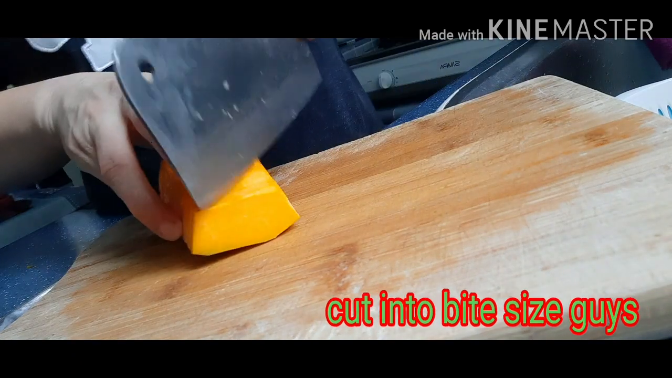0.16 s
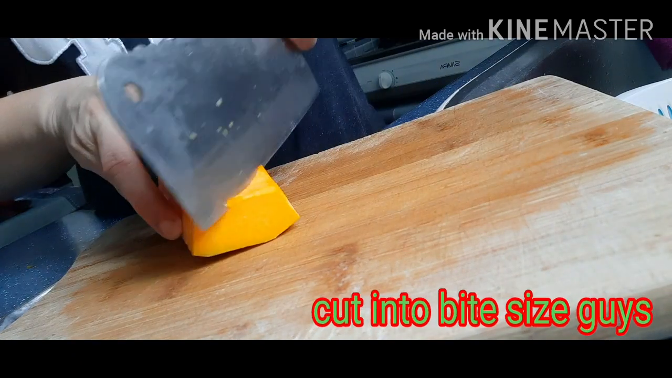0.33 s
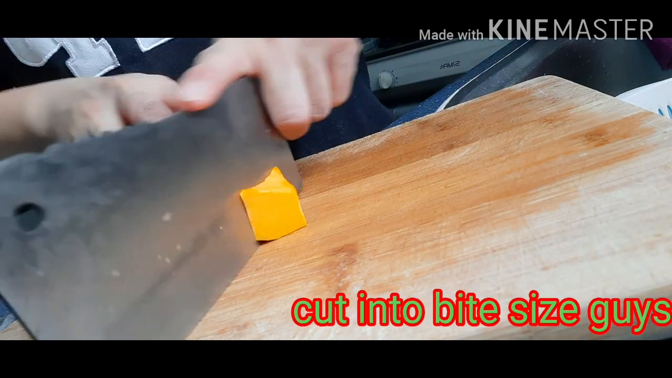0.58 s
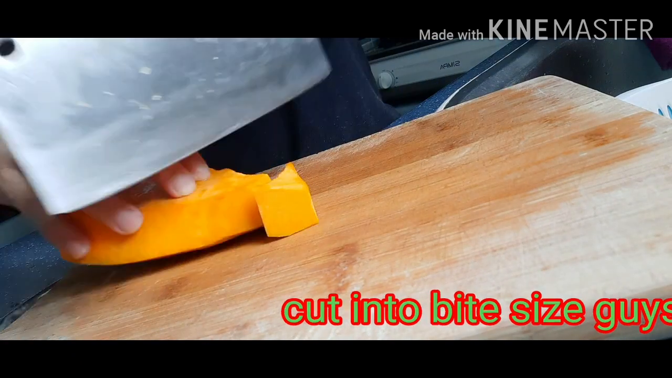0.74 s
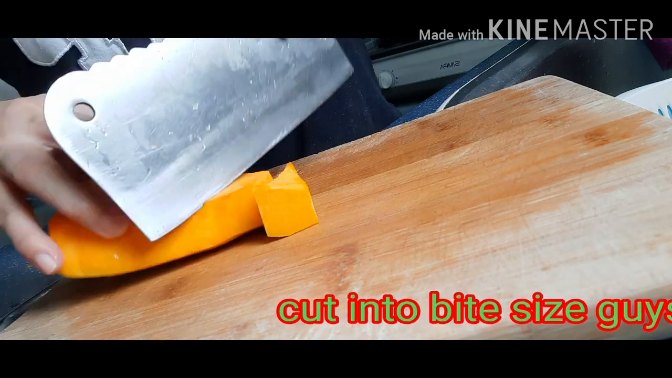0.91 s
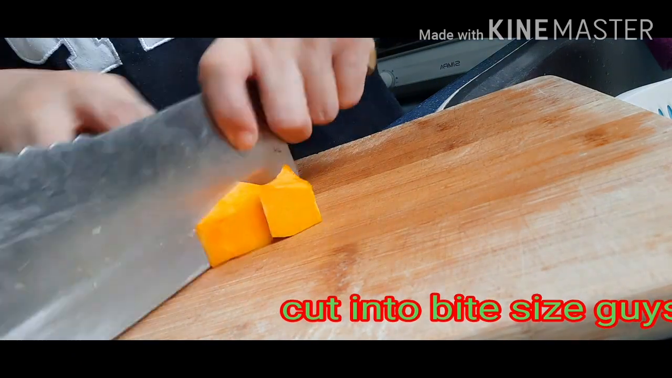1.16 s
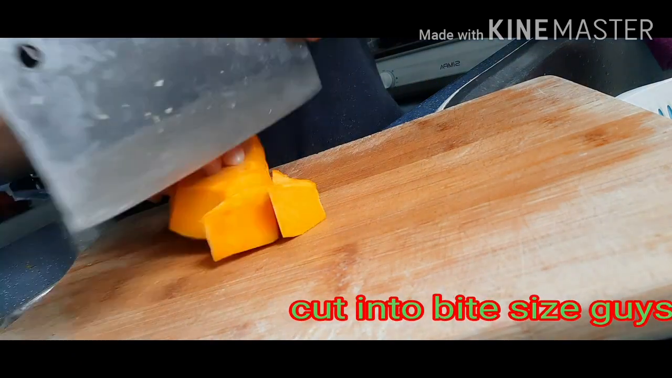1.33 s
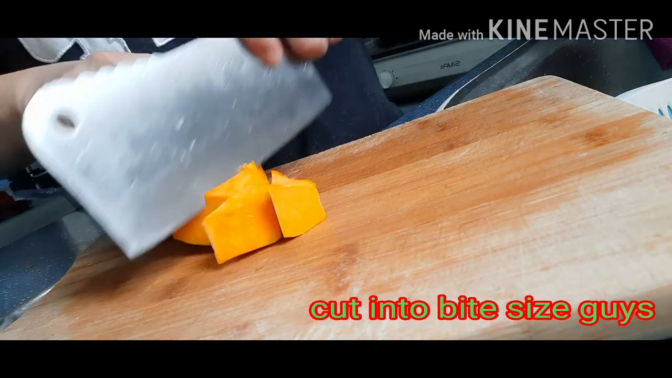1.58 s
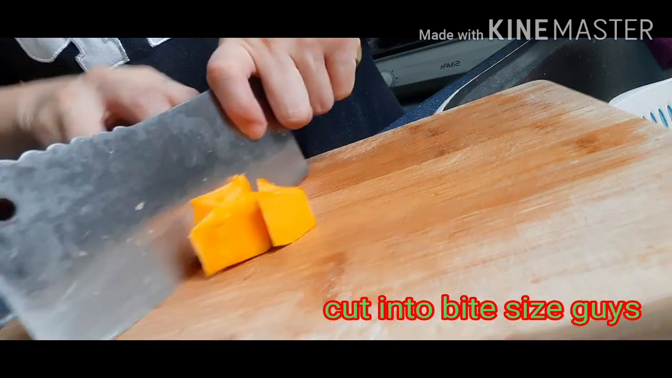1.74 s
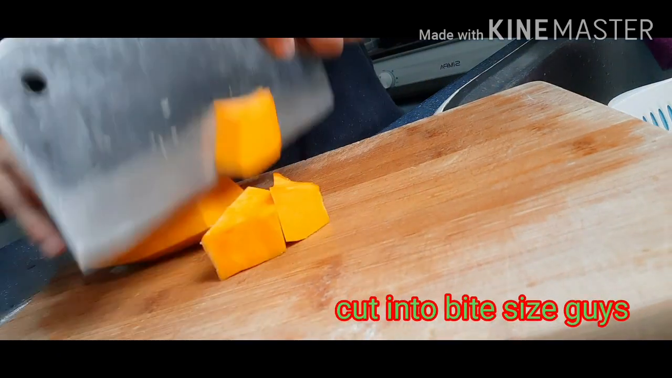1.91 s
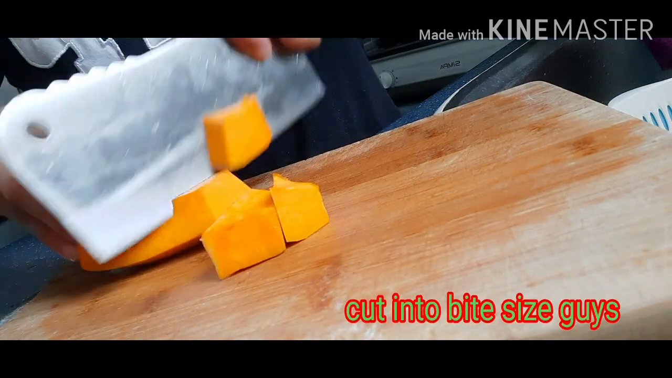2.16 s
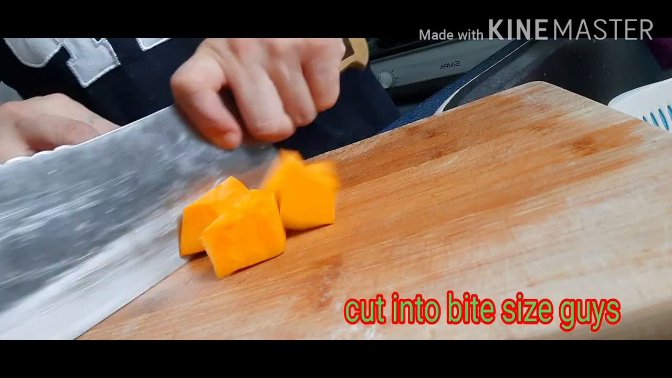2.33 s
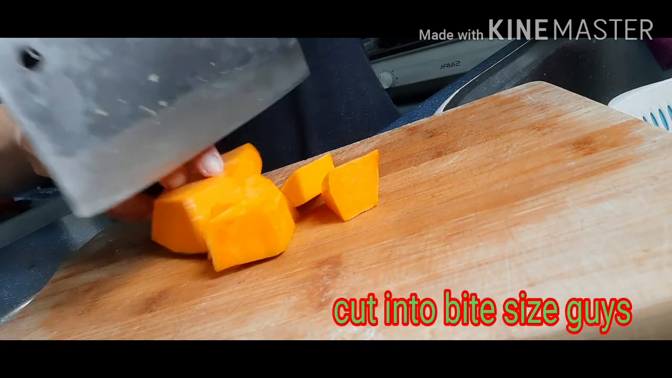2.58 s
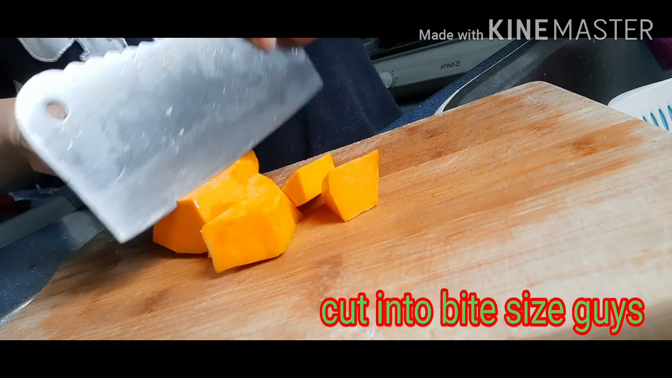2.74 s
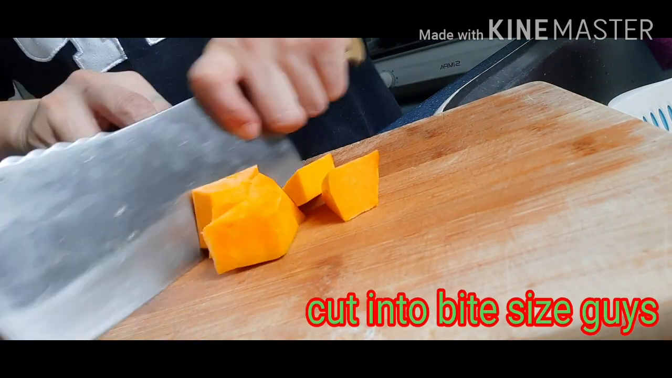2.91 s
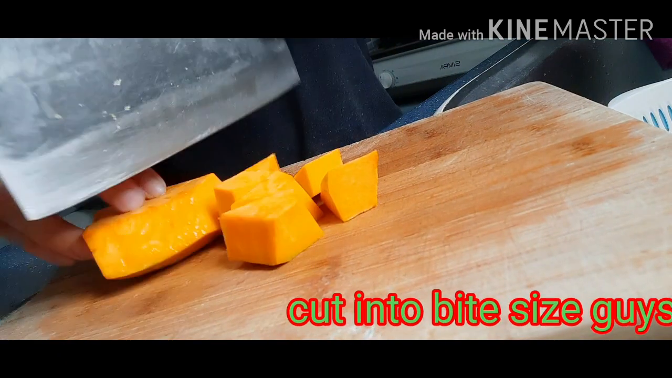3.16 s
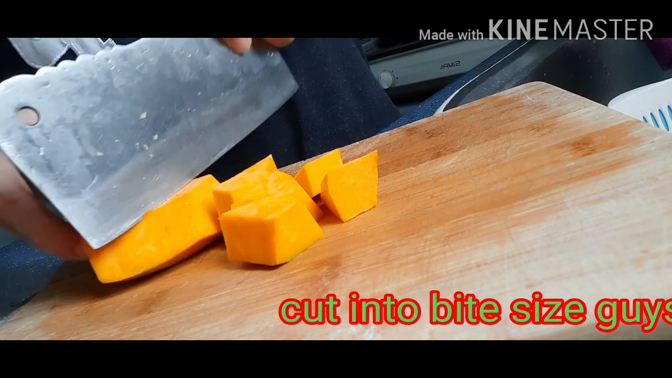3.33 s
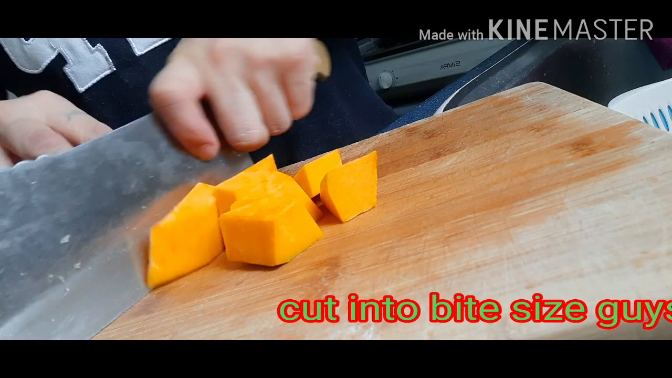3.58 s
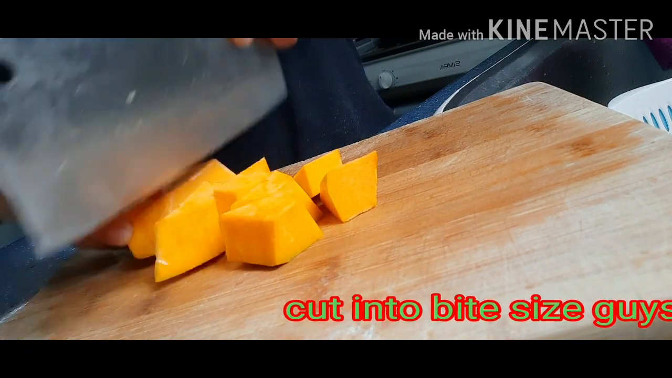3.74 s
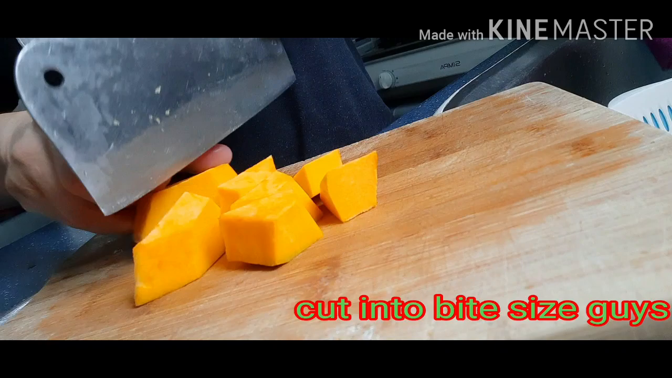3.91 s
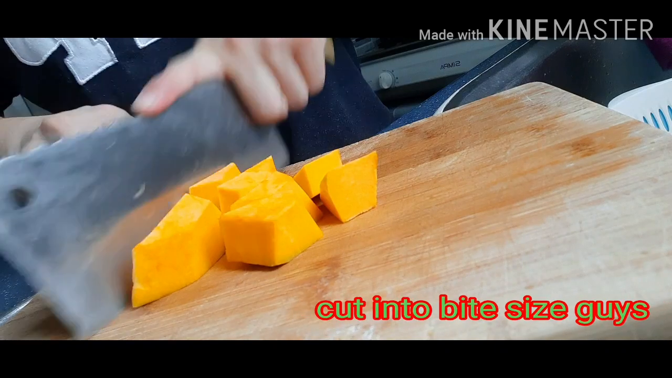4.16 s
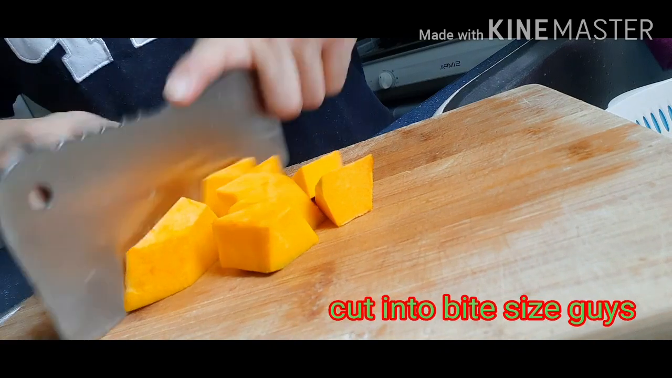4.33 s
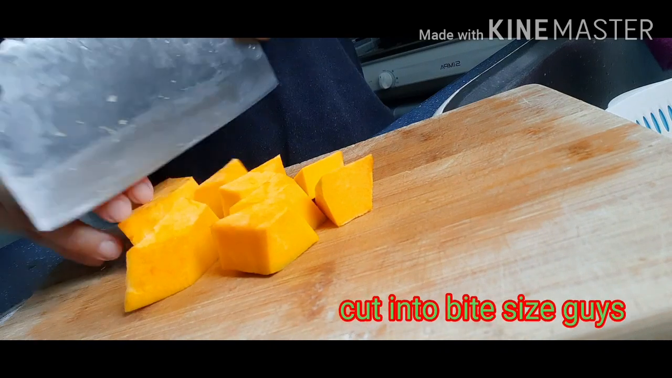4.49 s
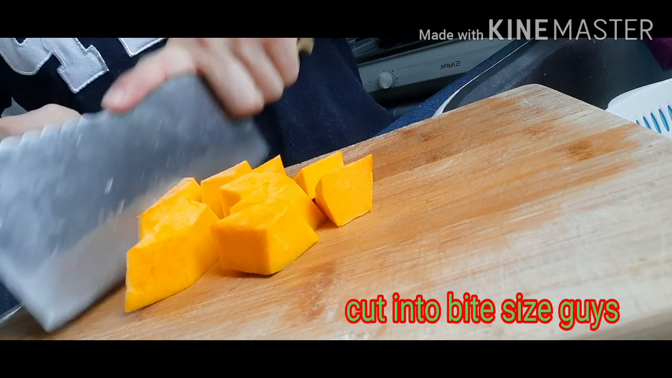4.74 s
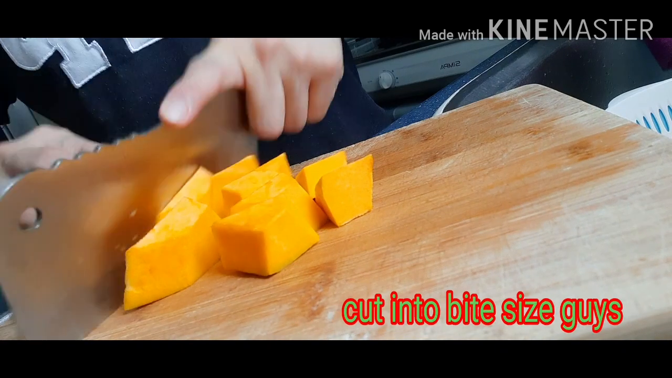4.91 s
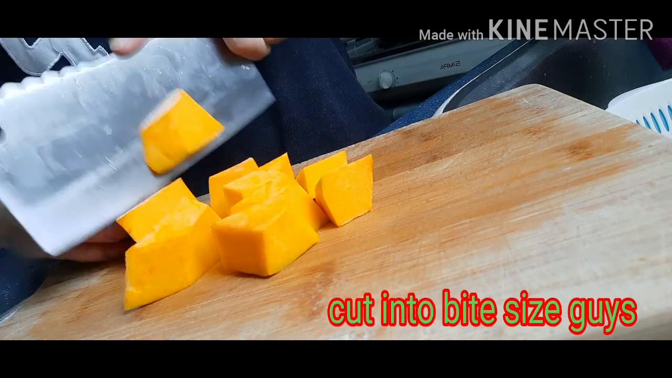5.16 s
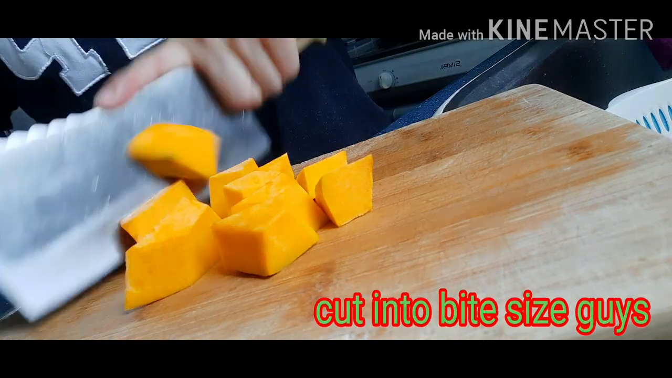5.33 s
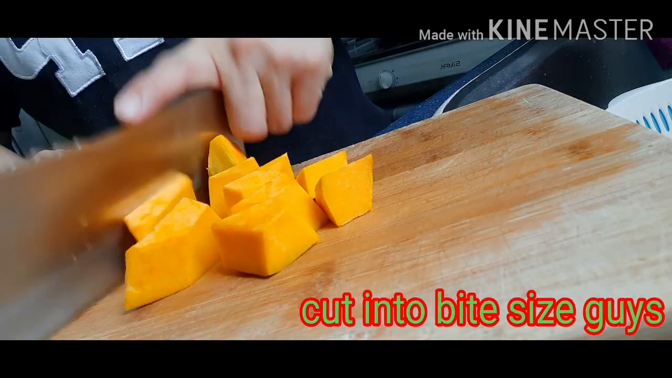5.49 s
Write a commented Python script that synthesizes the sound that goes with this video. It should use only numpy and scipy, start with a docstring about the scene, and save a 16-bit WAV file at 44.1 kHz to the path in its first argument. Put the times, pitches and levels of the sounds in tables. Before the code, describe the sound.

A steel cleaver cuts pumpkin into cubes on a wooden board, nine chops at a steady, unhurried pace. Each starts with a small bite into the rind, swells into a crisp hiss and ends in a snap, a wooden knock and a dull thump. Between chops the wet blade drags briefly and loose cubes tumble softly. The sound is close, in a small kitchen with a short echo and a faint low rumble.

```python
"""Nine crisp chops in a row, each ending in a wooden knock: a steel cleaver cubes pumpkin on a board.
Each time the edge bites the rind, hisses through the flesh ever faster, and the last of it snaps.
The blade's tip knocks on the board, its heel (the back end) rocks down after it, and the board thumps
on the counter. The wet blade drags as it lifts, and loose cubes tumble.
The small kitchen adds a short echo and a low, steady rumble."""
import sys
import numpy as np
from scipy import signal
from scipy.fft import rfft, irfft
from scipy.io import wavfile

SR = 44100
rng = np.random.default_rng(int(sys.argv[2]) if len(sys.argv) > 2 else 0)


def int16_out(signal):
    """Quantize to a 16-bit WAV file."""
    q = np.round(np.clip(np.atleast_2d(signal).T, -1, 1) * 32767)
    wavfile.write(sys.argv[1], SR, q.astype(np.int16))


N = 250488
TIME = np.arange(N) / SR

# Table levels are relative. A blow's "hardness" is the pitch above which its knock is muffled.
# The edge bites the rind: t/s, crack level/dB, crack centre/Hz, knock level/dB
RIND_BITES = [(.198, -52, 9000, -60), (.889, -42, 9000, -58), (1.472, -50, 9000, -67),
              (2.086, -21, 2400, -37), (2.692, -50, 4000, -49), (3.3074, -50, 8900, -73),
              (3.982, -51, 9000, -55.5), (4.6, -25.5, 2920, -35.5), (5.182, -19.5, 3350, -32.5)]
# The flesh gives way: snap t/s, pressing hiss/dB, final rush/dB, snap level/dB, tearing before it/s
FLESH_CUTS = [(0.4938, -48, -37.5, -21.5, .002), (1.072, -45, -37.5, -28.5, .002),
              (1.684, -43.5, -39.5, -16.5, .002), (2.276, -46, -39, -33, .011),
              (2.882, -46, -42, -22, 0.012), (3.469, -48, -34.5, -19, 0.02), (4.166, -45, -52, -18, .036),
              (4.791, -45.5, -45, -16, .006), (5.3564, -43.5, -35, -18.5, .006)]
# The blade lands: tip t/s, knock/dB, thump/dB, hardness/Hz, click/dB, heel delay/s, heel knock/dB
BLADE_LANDINGS = [(.4827, -21.5, -14.5, 1200, -40, 0.018, -20.5),
                  (1.0623, -20, -17.5, 1490, -21, 0.037, -27), (1.666, -16.5, -18, 1160, -45, 0.033, -22.5),
                  (2.277, -13.5, -13.5, 1380, -22.5, 0.014, -27.5),
                  (2.8847, -17, -15, 2840, -11.5, 0.012, -20.5),
                  (3.4853, -19.5, -19, 2290, -10.5, 0.016, -25.5),
                  (4.1692, -17, -17, 1800, -15.5, .0185, -25.5),
                  (4.7935, -16, -23.5, 1670, -43, 0.0092, -31), (5.3535, -22.5, -22, 1600, -55, 0.03, -26)]


def from_db(db):
    """Turn decibels into a factor to multiply by."""
    return 10 ** (np.asarray(db) / 20)


def unit_power(x):
    """Scale a sound to an average power of one."""
    return x / np.sqrt(np.mean(x ** 2) + 1e-20)


def at_hz(points, hz):
    """Read between a table's rows, with the octaves evenly spaced."""
    freqs, values = np.transpose(points)
    return np.interp(np.log(np.maximum(hz, 1)), np.log(freqs), values)


def butter(x, hz, kind, order=2):
    """Keep the lows, the highs or a band; a higher order cuts more steeply."""
    return signal.sosfilt(signal.butter(order, np.clip(hz, 10, .48 * SR), kind, fs=SR, output="sos"), x)


def colour(x, spectrum):
    """Give a noise the tone colour in a table, at a power of one."""
    hz = np.arange(N // 2 + 1) * SR / N
    return unit_power(irfft(rfft(x) * from_db(at_hz(spectrum, hz)), N))


def dying(t, fade_s):
    """A smooth fade that is 60 dB down after fade_s."""
    return np.exp(-np.log(1000) * t / fade_s)


def add(track, s, sound):
    """Mix a sound in, starting at s seconds."""
    start = int(np.clip(s * SR, 0, N - 1))
    track[start:start + len(sound)] += sound[:N - start]


def rumble():
    """The kitchen's low, steady background, alike on both sides in the bass."""
    # Tone colour of the rumble: f/Hz, level/dB
    spectrum = [(30, -37), (60, 1), (100, 3.5), (170, 7), (300, -9), (430, -2), (600, -15), (1100, -17),
                (1700, -29), (2500, -24.5), (4500, -39.5), (9000, -42.5), (15000, -46.5)]
    mid, side = colour(rng.standard_normal((2, N)), spectrum)
    return from_db(-52.5) * (mid + butter(side, 550, "high", order=1) * [[1], [-1]])


def kitchen_echo(x):
    """Walls and cupboards send back many echoes, different at each ear; the highest notes die first."""
    # Strength of the echo: f/Hz, level/dB
    echo_levels = [(60, -29.5), (150, -10), (400, -6.5), (1000, -8.5), (2200, -6.5), (5000, -10),
                   (14000, -7)]
    # How long the echo lasts: f/Hz, fade time/s
    echo_fades = [(100, .27), (500, 0.18), (2000, 0.16), (6000, 0.19), (14000, 0.1)]
    t, octave_edges = TIME[:SR // 2], 60 * 2 ** np.arange(9.)
    white, response = rng.standard_normal((2, 2, len(t))), 0
    onset = np.clip((t - .004) / .004, 0, 1)   # the nearest walls answer after 4 ms
    for k, (low, high) in enumerate(zip(octave_edges, octave_edges[1:])):
        hz = np.sqrt(low * high)
        tail = butter(white[k % 2], [low, high], "band") * onset * dying(t, at_hz(echo_fades, hz))
        band_share = np.sqrt(2 * (high - low) / SR / len(t))
        mid, side = unit_power(tail) * band_share * from_db(at_hz(echo_levels, hz))
        alike = 1 / (1 + (hz / 450) ** 2)   # long waves reach both sides alike
        response = response + np.sqrt(1 + alike) * mid + np.sqrt(1 - alike) * side * [[1], [-1]]
    return signal.fftconvolve(x[None], response, axes=1)[:, :N]


def blade_reflections(x, sways_per_s=4, sway_share=.3433):
    """Treble bounces off the blade and board, along paths that grow and shrink as the blade moves."""
    # The bounces: left delay/s, right delay/s, level/dB
    bounces = [(.0013, .0017, -3.5), (.0027, .0022, -2.5), (.0036, .0044, -4.5)]
    treble, out = butter(x, 2200, "high"), np.zeros((2, N))
    turns = np.arange(32) / sways_per_s
    for left_s, right_s, db in bounces:
        stretch = 1 + sway_share * np.interp(TIME, turns, rng.uniform(-.998, 1, len(turns)))
        delayed = [np.interp(TIME - lag * stretch, TIME, treble) for lag in (left_s, right_s)]
        out += from_db(db) * np.array(delayed)
    return out


def bursting_cells(pops_per_s=700, grain_db=3, pop_db=-3.5):
    """Countless pumpkin cells burst in a fizz, and tearing fibres add scattered pops."""
    # Tone colour of the slicing hiss: f/Hz, level/dB
    spectrum = [(300, 22.5), (1100, 9), (1700, 3), (2200, 8), (3200, 3), (4800, -4.5), (7000, 1.5),
                (11500, -2.5), (13500, -2.5), (15500, -15)]
    sizes = from_db(grain_db * np.minimum(rng.exponential(1, N), 4)) * rng.choice([-1, 1], N)
    pops = unit_power(sizes * (rng.random(N) < pops_per_s / SR))
    return colour(rng.standard_normal(N) + from_db(pop_db) * pops, spectrum)


def slicing(sink_s=.0083, rush_s=.021, release_s=.039):
    """The flesh rasps louder as the hand bears down, then gives way with a bright rush."""
    pressure, speed = np.zeros((2, N))
    for (bite_s, *_), (snap_s, press_db, rush_db, _, _) in zip(RIND_BITES, FLESH_CUTS):
        start = bite_s + sink_s   # the edge reaches the flesh
        release = np.exp(-np.maximum(TIME - snap_s, 0) / release_s)
        pressure += from_db(press_db) * np.clip((TIME - start) / (snap_s - start), 0, 1) * release
        speed += from_db(rush_db) * np.exp(np.minimum(TIME - snap_s, 0) / rush_s) * release
    crunch = bursting_cells()
    return pressure * butter(crunch, 250, "high") + speed * butter(crunch, 2500, "high")


def crack_events(bite_fade_s=.0072, click_fade_s=.0037, click_hz=5300, snap_fade_s=.0074, snap_hz=10400):
    """List each rind bite, click into the wood, drag, tear and snap: t/s, level/dB, fade/s, f/Hz."""
    # The wet blade drags past the cut faces as it lifts: t/s, level/dB, fade time/s, centre/Hz
    wet_drags = [(1.301, -53.5, 0.098, 6000), (1.799, -38, 0.13, 3750), (2.3772, -43, 0.039, 3550),
                 (2.478, -50.5, 0.16, 7000), (3.008, -37.5, 0.044, 4670), (3.025, -32.5, .013, 6030),
                 (3.6124, -36, 0.014, 7850), (3.779, -53, 0.05, 7800), (4.3008, -24.5, 0.011, 4070),
                 (5.435, -34, 0.047, 4770)]
    rows = [(s, db, bite_fade_s, hz) for s, db, hz, _ in RIND_BITES]
    rows += [(s + .0015, db, click_fade_s, click_hz) for s, _, _, _, db, _, _ in BLADE_LANDINGS]
    rows += list(wet_drags)
    for snap_s, _, _, snap_db, tear_s in FLESH_CUTS:
        # Uneven little tears lead up to the snap, growing by 332 dB a second.
        leads_s = np.cumsum(.0042 * rng.uniform(.5, 1.5, size=12))
        levels = snap_db - 332 * leads_s - 3.5 * rng.standard_normal(len(leads_s))
        rows += [(snap_s, snap_db, snap_fade_s, snap_hz)]
        rows += [(snap_s - lead, db, snap_fade_s, snap_hz)
                 for lead, db in zip(leads_s, levels) if lead < tear_s]
    return rows


def cracks(grain_db=4, first_db=14.5):
    """A crack is one big break followed by many tiny ones; slow, sticky ones swell up instead."""
    out, t = np.zeros(N), TIME[:SR // 8]
    noise = rng.standard_normal(N + len(t))
    grains = unit_power(noise * from_db(grain_db * np.minimum(rng.exponential(1, len(noise)), 4)))
    first_break = from_db(first_db) * (np.arange(len(t)) == 8)
    for s, db, fade_s, centre_hz in crack_events():
        burst = first_break + grains[int(s * SR):][:len(t)]
        burst = butter(burst, centre_hz / 2, "high", order=1)
        burst = butter(burst, min(1.8 * centre_hz, 15000), "low", order=3)
        swell = 1 - np.exp(-t / fade_s ** 2)
        add(out, s, from_db(db - 7) * unit_power(burst) * swell * dying(t, fade_s))
    return butter(out, 790, "high")


def knock_events(bite_hz=2950, heel_hz=1650, settle_hz=1200):
    """List each touch on the board by blade or cube: t/s, knock/dB, thump/dB, hardness/Hz."""
    # Cubes tip over and the piece is shifted: t/s, knock/dB, counter thump/dB, hardness/Hz
    tumbles = [(.002, -46, -37.5, 480), (.591, -47, -31.5, 885), (.68, -45.5, -46, 1320),
               (1.274, -49, -40.5, 700), (1.79, -44.5, -39, 1296), (1.817, -40.5, -32.5, 1900),
               (1.874, -46.5, -31.5, 890), (2.249, -44, -29.5, 600), (2.3772, -47, -39, 2350),
               (2.389, -42.5, -42, 1950), (2.565, -45.5, -35.5, 500), (3.025, -34.5, -25.5, 1720),
               (3.06, -36, -23, 580), (3.319, -61, -30.5, 450), (3.614, -41, -32.5, 1600),
               (3.684, -48.5, -46, 1790), (3.835, -51.5, -54, 1200), (4.3002, -29, -29.5, 2252),
               (4.916, -49.5, -35, 700)]
    rows = [(s, db, db + 6.5, bite_hz) for s, _, _, db in RIND_BITES]
    for s, tip_db, thump_db, hardness_hz, _, heel_s, heel_db in BLADE_LANDINGS:
        heel_thump_db = thump_db + 2.5   # the heel brings the arm's weight
        rows += [(s, tip_db, thump_db, hardness_hz),
                 (s + heel_s, heel_db, heel_thump_db, heel_hz),
                 (s + heel_s + .018, heel_db - 8.5, heel_thump_db - 14.5, settle_hz)]   # one last rock
    return rows + list(tumbles)


def strike(tones, fade_at_160hz_s, spread_db, detune):
    """Struck wood rings: where the blow lands sets each tone's strength; the hand shifts its pitch."""
    t = TIME[:int(1.3 * fade_at_160hz_s * SR)]
    hz, db = np.transpose(tones)[:, :, None]
    strength, hand_load = rng.standard_normal((2, len(tones), 1))
    fade_s = fade_at_160hz_s * (160 / hz) ** .6   # higher tones die sooner
    waves = np.sin(2 * np.pi * hz * (1 + detune * hand_load) * t)
    return np.sum(from_db(db + spread_db * strength) * dying(t, fade_s) * waves, axis=0)


def delay_lows(x, hz):
    """Low notes travel more slowly through wood, so a blow sweeps downwards in pitch."""
    w = np.tan(np.pi * hz / SR)
    feedback = [1 + 2 * w + w * w, 2 * (w * w - 1), 1 - 2 * w + w * w]
    return signal.lfilter(feedback[::-1], feedback, x)


def knocks(board_detune=.022, counter_detune=.039, counter_lag_s=.004):
    """Each touch clacks, the board bends and rings, and the heavy counter thumps a moment later."""
    # Tone colour of the contact's clack: f/Hz, level/dB
    clack_spectrum = [(250, -6), (600, 8), (1150, -35.5), (1400, -11), (1800, -1), (2150, -6), (2700, 0.5),
                      (4000, -0.5), (7000, -21.5), (14000, -18.5)]
    # The board bends briefly right under the edge: f/Hz, level/dB
    flex_tones = [(575, -6), (800, -20.5), (1130, 1), (2150, -16), (3200, -24.5), (5000, -40.5)]
    # The board rings with the blade on it: f/Hz, level/dB
    board_tones = [(400, -8.5), (445, -0.5), (525, -17.5), (660, -1.5), (715, -12), (778, -1), (961, -1.5),
                   (1092, -6.5), (1164, -12), (1240, -46), (1472, -13.5), (2016, -18.5), (2168, 2.5),
                   (2300, -26.5), (2775, -1.5), (3576, -18.5)]
    # The board shoves briefly against the counter: f/Hz, level/dB
    shove_tones = [(105, -18.5), (225, -4)]
    # The counter rings under the board: f/Hz, level/dB
    counter_tones = [(91, -4), (118, -9), (160, -2), (209, -2), (240, -19), (278, -10), (315, -15)]
    out, t = np.zeros(N), TIME[:SR // 4]
    clack_noise = from_db(5.5) * colour(rng.standard_normal(N), clack_spectrum)
    for s, knock_db, thump_db, hardness_hz in knock_events():
        start = rng.integers(N - len(t))
        wood = clack_noise[start:start + len(t)] * dying(t, fade_s=.031)
        add(wood, 0, strike(flex_tones, .068, spread_db=2, detune=board_detune))
        add(wood, 0, strike(board_tones, .11, spread_db=3.5, detune=board_detune))
        wood = butter(wood, 430, "high")   # the board alone is too small to give off bass
        thump = np.zeros(len(t))
        add(thump, 0, strike(shove_tones, .032, spread_db=2, detune=counter_detune))
        add(thump, 0, strike(counter_tones, .11, spread_db=3.5, detune=counter_detune))
        add(out, s, from_db(knock_db - 2.5) * butter(wood, hardness_hz, "low"))
        add(out, s + counter_lag_s, from_db(thump_db - 5.5) * butter(thump, 427, "low"))
    return delay_lows(out, hz=450)


def scene(left_lag_s=.00019):
    """The board lies a little to the right, so the left side hears it later and with less treble."""
    chopping = knocks() + slicing() + cracks()
    direct = np.array([np.interp(TIME - left_lag_s, TIME, chopping), chopping])
    left, right = direct + blade_reflections(chopping) + kitchen_echo(chopping)
    left_lows = butter(left, 1700, "low", order=1)
    left = left_lows + from_db(-3) * (left - left_lows)
    return np.array([left, right]) + rumble()


def record(dry):
    """The microphone loses the deep bass and the very highest treble."""
    thin = butter(dry, 105.2, "high", order=4)
    return signal.sosfilt(signal.ellip(10, .2, 80, 15800, fs=SR, output="sos"), thin)


dry = scene()
out = record(dry)
int16_out(out)
```